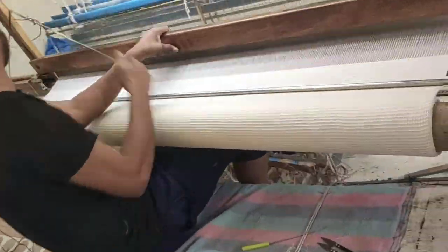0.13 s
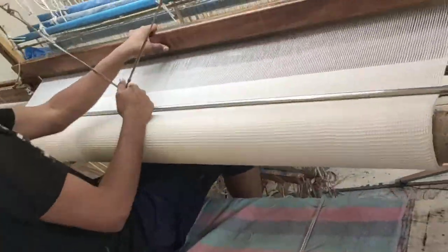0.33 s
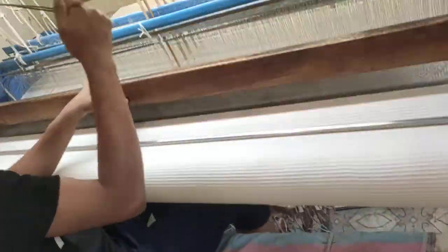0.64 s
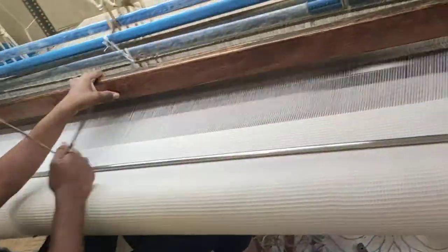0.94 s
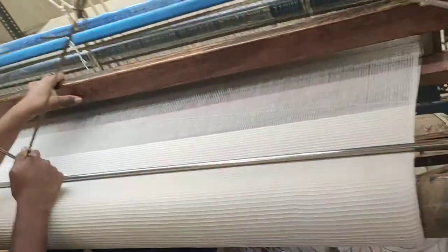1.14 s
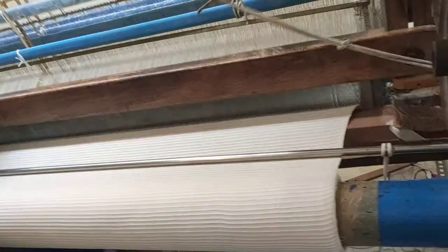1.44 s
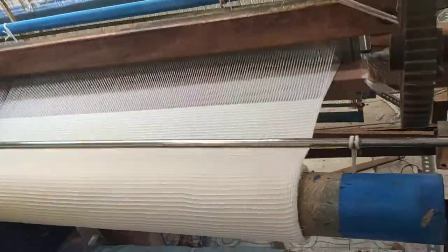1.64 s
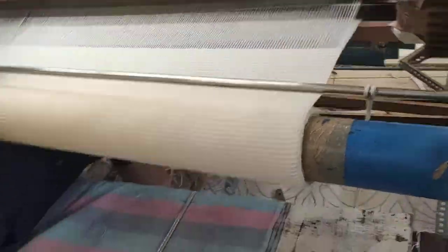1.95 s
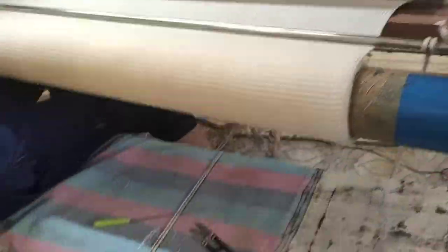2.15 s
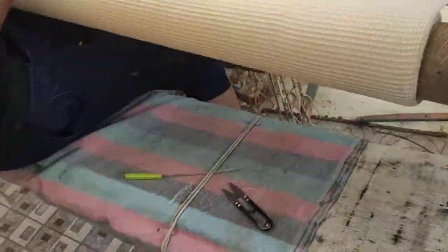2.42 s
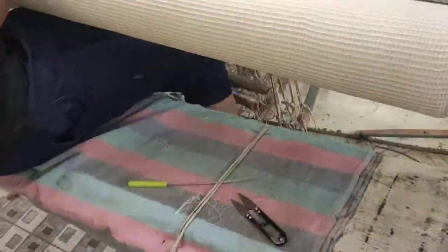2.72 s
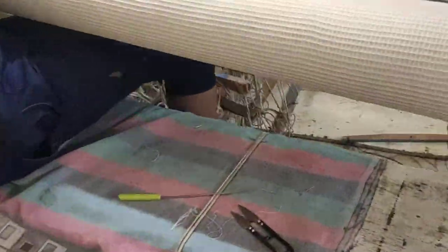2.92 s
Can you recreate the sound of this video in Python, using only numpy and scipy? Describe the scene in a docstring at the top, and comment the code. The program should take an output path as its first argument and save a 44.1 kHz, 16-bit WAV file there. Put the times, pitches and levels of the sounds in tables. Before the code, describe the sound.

A wooden handloom clacks loudly and rapidly, rattling and chinking in a hard-walled workshop.

```python
"""A low workshop drone and the rattle of a wooden handloom come first, close up in a hard-walled room.
Then shuttle, picker and beater clack about four times a second: chattering contacts drive wood, beam and crack.
Smaller taps fall between the blows; loose rings and rods chink in their own modes, and a cord squeaks on its pulley.
Rattle and rustle are grainy noise that follows the shaking loom. The loudest blows overload at full scale."""
import sys
import numpy as np
from scipy import signal
from scipy.fft import rfft, irfft, next_fast_len
from scipy.io import wavfile
from scipy.ndimage import uniform_filter1d

SR = 44100
rng = np.random.default_rng(int(sys.argv[2]) if len(sys.argv) > 2 else 0)


def transcribe(u):
    """Save the signal u as a 16-bit wav file named by the first command-line argument.

    u: samples, shape (n,) or (channels, n), limited to [-1, 1]; the rate is SR.
    q: integer samples, one column per channel.
    """
    v = np.clip(np.atleast_2d(u).T, -1, 1)
    q = np.round(v * 32767).astype(np.int16)
    wavfile.write(sys.argv[1], SR, q)


def voltage_ratio(level):
    """Linear amplitude factor for a level in decibels (scalar or array-like)."""
    return 10 ** (np.asarray(level, float) / 20)


N = 135828  # samples


def along(points, hz):
    """Reads a curve of (Hz, value) points on a log frequency axis."""
    point_hz, value = np.transpose(points)
    return np.interp(np.log(hz + 1), np.log(point_hz + 1), value)


def unit(x):
    """Scales to rms 1."""
    return x / np.sqrt(np.mean(x ** 2) + 1e-20)


def filtered(x, response):
    """Filters x by a complex response of frequency."""
    n = x.shape[-1]
    size = next_fast_len(n + 4096)
    return irfft(rfft(x, size) * response(np.fft.rfftfreq(size, 1 / SR)), size)[..., :n]


def resonances(peaks):
    """Causal sum of damped resonances with alternating sign."""
    def response(f):
        total = 0
        for k, (centre, width, db) in enumerate(peaks):
            band = 1j * f * width
            total = total + (-1) ** k * voltage_ratio(db) * band / (centre ** 2 - f ** 2 + band)
        return total
    return response


def grainy(shape, spiky_db, grain_s):
    """Noise whose size jumps from grain to grain, as in a run of unequal small contacts."""
    step = max(int(grain_s * SR), 1)
    spikes = np.minimum(rng.exponential(1, shape[-1] // step + 1), 3.5)
    size = voltage_ratio(spiky_db * spikes).repeat(step)[:shape[-1]]
    return rng.standard_normal(shape) * uniform_filter1d(size, step)


# how alike left and right are in the wide layers: pitch_hz, likeness (correlation, 0-1)
LIKENESS = [(30,0.56),(125,0.86),(300,0.95),(550,0.7),(1000,0.019)]


def spread(pair, spectrum):
    """Colours two unrelated signals and mixes them to a stereo pair of rms 1 with the tabled likeness."""
    def mid_side(hz):
        angle = np.arccos(np.clip(along(LIKENESS, hz), -1, 1)) / 2
        return voltage_ratio(along(spectrum, hz)) * [np.cos(angle), np.sin(angle)]
    mid, side = filtered(pair, mid_side)
    return unit(np.array([mid + side, mid - side]))


def answer(x, t60, seconds):
    """Reverberates x through a fresh decaying noise tail in each channel; t60 as (Hz, s)."""
    hz, t, grid = signal.stft(rng.standard_normal((2, int(SR * seconds))), SR, nperseg=128)
    decay = voltage_ratio(-60 * t / along(t60, hz)[:, None])
    tail = signal.istft(grid * decay, SR, nperseg=128)[1]
    return signal.fftconvolve(x[None], tail / np.linalg.norm(tail[0]), axes=1)


def add(out, s, x):
    """Mixes x into out from time s."""
    start = round(s * SR)
    out[:, start:start + x.shape[1]] += x


# left-right delay as the camera turns: time_s, right_later_s
TURN = [(.9,.00015),(1.4,-.0003),(2.2,.0002),(2.75,-.00025)]
# decay of the hard-walled room: pitch_hz, t60_s
ROOM_DECAY = [(500,0.35),(3000,0.47),(12000,0.18)]


def place(out, s, x):
    """Sets a sound in space: direct with a left-right delay, then the loom's near surfaces, then the room."""
    near_db, near_t60_s, room_db = 1, .012, -6.5
    half_lag = np.interp(s, *np.transpose(TURN)) / 2
    # the padding leaves space for the channel that is moved earlier
    direct = filtered(np.pad(x, (16, 0)),
                      lambda hz: np.exp(2j * np.pi * hz * half_lag * np.array([[1], [-1]])))
    near = answer(x, [(1000, near_t60_s)], seconds=.03)
    far = answer(x, ROOM_DECAY, seconds=.4)
    add(out, s, direct)
    add(out, s + .0006, voltage_ratio(near_db) * near)
    add(out, s + .006, voltage_ratio(room_db) * far)


# spectrum of the drone: pitch_hz, relative_db (per Hz)
DRONE_COLOUR = [(20,1.5),(110,-2),(200,-2),(400,-1.5),(900,-3.5),(1500,-21.5)]
# hum lines: pitch_hz, level_db (peak)
HUM_LINES = [(100, -44), (132, -43.5)]
# dull thumps: start_s, length_s, level_db (peak), pitch_hz
THUMPS = [(1.61,.07,-26,40),(2.64,.07,-30,35),(1.46,.03,-27,290),(1.49,.04,-29,400)]


def shop():
    """Low noise drone, two hum lines whose phase wanders, and a few thumps with bell-shaped swells."""
    drone_db = -31
    t = np.arange(N) / SR

    def wavering(hz):
        wander = np.cumsum(rng.standard_normal(N)) * 0.0195  # radians
        return np.sin(2 * np.pi * hz * t + wander)

    hum = sum(voltage_ratio(db) * wavering(hz) for hz, db in HUM_LINES)
    thumps = np.zeros(N)
    for s, length, db, hz in THUMPS:
        swell = np.exp(-((t - s - length / 2) / length * 3.0) ** 2)
        thumps += voltage_ratio(db) * swell * wavering(hz)
    drone = voltage_ratio(drone_db) * spread(rng.standard_normal((2, N)), DRONE_COLOUR)
    return drone + hum + thumps


# the loom shaking between blows: time_s, rattle_db (frame), rustle_db (heddles)
SHAKING = [(.03,-21.5,-27),(.26,-26.5,-41),(.37,-18,-28.5),(.5,-22.5,-38),(.6,-20.5,-30.5),(.99,-25,-40.5),(1.07,-16.5,-22.5),(1.15,-18.5,-25),(1.26,-22.5,-31),(1.42,-24,-30.5),(1.5,-21.5,-27.5),(1.68,-26,-41),(1.769,-16,-28),(1.94,-25,-54),(2.04,-20.5,-37),(2.4,-27,-36.5),(2.5,-15,-23.5),(2.57,-20,-24),(2.69,-24.5,-35.5),(2.88,-24,-33),(2.95,-20,-28.5),(3.08,-27.5,-31.5)]
# spectrum of the frame rattle: pitch_hz, relative_db (per Hz)
FRAME_COLOUR = [(500,-26.5),(900,-2.5),(1150,0),(2800,-1.5),(3900,-5.5),(4600,-11.5),(7000,-23)]
# spectrum of the heddle rustle: pitch_hz, relative_db (per Hz)
HEDDLE_COLOUR = [(2500,-24),(4500,1.5),(8000,-1),(12000,-10),(16000,-43)]


def frame():
    """Dense small knocks of the shaking frame and the finer rustle of the heddles, as grainy noise."""
    sharp_hz, sharpens = 9500, .6  # the rustle above this swings wider: extra dB per dB
    s, rattle_db, rustle_db = np.transpose(SHAKING)

    def level(db):
        return voltage_ratio(np.interp(np.arange(N) / SR, s, db))

    rattle = spread(grainy((2, N), spiky_db=1.78, grain_s=.003), FRAME_COLOUR)
    rustle = spread(grainy((2, N), spiky_db=2.5, grain_s=0.0022), HEDDLE_COLOUR)
    top = filtered(rustle, lambda hz: hz ** 2 / (hz ** 2 + sharp_hz ** 2))
    top_db = rustle_db + sharpens * (rustle_db - rustle_db.mean())
    return level(rattle_db) * rattle + level(rustle_db) * (rustle - top) + level(top_db) * top


# wooden blows: start_s, level_db, knock_db (low, over the wood), crack_db (bright, over the wood), chatter_s
BLOWS = [(.288,-9,-8,-4.5,0.0052),(.519,-2.5,-1,-7.5,0.011),(0.556,-17,-8,-13,0.013),(0.746,-8.5,-4.5,-13.5,0.0064),(1.032,-7,-4.5,3,0.0076),(1.049,-16.5,-8,3,0.012),(1.073,-15,-8.5,-4,0.013),(1.2804,-2,-11.5,-8.5,0.011),(1.7382,-7.5,-7,0,0.0035),(1.9671,-3,-3.5,-4.5,0.016),(2.017,-16,-1.5,-20,0.0092),(2.21,-4.5,-3.5,-37,0.0035),(2.43,-23,-5.5,-6,0.027),(2.459,-12.5,-0.5,2.5,0.014),(2.7093,-0.5,-11.5,-9.5,0.014)]
# small loose parts tapping between the blows: start_s, level_db, crack_db (bright, over the wood)
LOOSE_TAPS = [(.332,-23,4.5),(.951,-13,-29),(1.142,-20,7),(1.476,-17,-15),(1.843,-20,4),(2.921,-15,-13),(2.935,-20.5,6.5),(2.976,-16.5,-24)]
# resonances of the struck wood: pitch_hz, width_hz, relative_db
WOOD_PEAKS = [(1637,440,-0.5),(2410,410,2.5),(2817,680,1),(3690,760,-1)]
# resonances of the low knock in the beam: pitch_hz, width_hz, relative_db
BEAM_PEAKS = [(478,316,-10.5),(778,313,-4),(1160,296,1)]
# spectrum of the bright crack, also the tick of the chinks: pitch_hz, relative_db (per Hz)
CRACK_COLOUR = [(3000,-39),(4500,-3),(9000,-1.5),(14800,-11.5),(16000,-49)]


def crack_response(hz):
    """Colour of the bright contact noise."""
    return voltage_ratio(along(CRACK_COLOUR, hz))


def clacks():
    """Each blow or tap is a short chatter of contacts that drives the wood, the beam and a bright crack."""
    rise_s, fall_db, fall_power = 0.00055, 9, 1.92  # attack, loss at the end of the chatter, abruptness
    tap_chatter_s, tap_knock_db = 0.004, -6.5
    out, t = np.zeros((2, N + SR)), np.arange(SR // 10) / SR
    taps = [(s, db, tap_knock_db, crack_db, tap_chatter_s) for s, db, crack_db in LOOSE_TAPS]
    for s, db, knock_db, crack_db, chatter_s in BLOWS + taps:
        fall = voltage_ratio(-fall_db * (t / max(chatter_s, .001)) ** fall_power)
        chatter = (1 - np.exp(-t / rise_s)) * fall
        contacts = unit(grainy((3, len(t)), spiky_db=2.0, grain_s=.0007))

        def driven(noise, response):
            # levelled by the same noise without the chatter envelope
            return filtered(noise * chatter, response) / np.std(filtered(noise, response))

        wood = driven(contacts[0], resonances(WOOD_PEAKS))
        knock = voltage_ratio(knock_db) * driven(contacts[1], resonances(BEAM_PEAKS))
        crack = voltage_ratio(crack_db) * driven(contacts[2], crack_response)
        place(out, s - .0015, voltage_ratio(db) * (wood + knock + crack))
    return out[:, :N]


# ring chinks: start_s, level_db, strike_point (0-1), damping (times the free decay rate)
RING_STRIKES = [(.401,-20,0.22,0.72),(1.867,-12.5,0.1,0.74)]
# modes of the ring: pitch_hz, relative_db, t60_s (at damping 1)
RING_MODES = [(6433,-1,.045),(8086,-9,.06),(9491,1,.045),(10930,-6,.056),(12780,-8,.06),(14920,-4,.04)]
# rod chinks: start_s, level_db, strike_point (0-1 along the rod), damping (times the free decay rate)
ROD_STRIKES = [(.627,-26,.2,2.2),(.674,-28.5,.1,1.3),(.729,-26,.2,1.4),(.827,-27,.2,2.3),(1.445,-17,.3,2.7),(1.494,-17,.19,2.3),(1.552,-23.5,0.22,2.8),(2.148,-22.5,.19,2.4),(2.218,-17,.09,1.25),(2.272,-17.5,0.34,1.1),(2.301,-18.5,.3,3)]
# modes of the rod: pitch_hz, relative_db, t60_s (at damping 1)
ROD_MODES = [(5030,-6,.12),(6380,-2,.16),(7805,0,.13),(9713,-2,.13),(12142,2,.15),(13440,-3,.13),(15000,-4,.13),(15358,-10,.15)]


def chinks(strikes, modes, swell_s):
    """A metal piece rings in the modes that move at the struck point, over a thin noise tick."""
    tick_db, tick_t60_s = -1.5, 0.056
    out, t = np.zeros((2, N + SR)), np.arange(SR // 6) / SR
    for s, db, point, damping in strikes:
        ring = np.zeros(len(t))
        for k, (hz, mode_db, t60) in enumerate(modes):
            decay = voltage_ratio(mode_db - 60 * damping * t / t60)
            movement = np.sin(np.pi * (k + 1) * point)
            ring += decay * movement * np.sin(2 * np.pi * (hz * t + rng.random()))
        ring *= 1 - np.exp(-t / swell_s)
        tick = unit(filtered(rng.standard_normal(len(t)), crack_response))
        tick = tick * voltage_ratio(tick_db - 60 * t / tick_t60_s)
        place(out, s - .001, voltage_ratio(db) * (ring + tick))
    return out[:, :N]


# cord squeaks: start_s, length_s, from_hz, to_hz, level_db (peak, direct sound)
CORD_SQUEAKS = [(0.995,0.031,10200,11700,-26),(1.226,0.066,11300,11000,-27)]


def squeaks():
    """Thin gliding squeaks of a cord on its pulley, made fuzzy by a jittering pitch."""
    out = np.zeros((2, N + SR))
    for s, length, from_hz, to_hz, db in CORD_SQUEAKS:
        n = int(length * SR)
        jitter_hz = 400 * unit(uniform_filter1d(rng.standard_normal(n), size=40))
        hz = np.linspace(from_hz, to_hz, n) + jitter_hz
        tone = np.sin(2 * np.pi * np.cumsum(hz) / SR)
        place(out, s, voltage_ratio(db) * np.hanning(n) ** .5 * tone)
    return out[:, :N]


# stereo balance of the whole mix: pitch_hz, left_over_right_db
BALANCE = [(500,-1),(2500,3),(12000,0.5)]


def scene():
    """Sums all sources in stereo and tilts the left-right balance over frequency."""
    mix = clacks()
    mix = mix + chinks(ROD_STRIKES, ROD_MODES, swell_s=0.00093)
    mix = mix + chinks(RING_STRIKES, RING_MODES, swell_s=0.0017)
    mix = mix + squeaks() + frame() + shop()
    return filtered(mix, lambda hz: voltage_ratio(np.outer([.5, -.5], along(BALANCE, hz))))


def band_limit(x):
    """A steep low-pass at the top of the band."""
    return signal.sosfilt(signal.butter(12, 16310, fs=SR, output="sos"), x)


def record(dry):
    """Cuts the extreme treble, then overloads hard at full scale."""
    top_hz = 15850
    limited = filtered(dry, lambda hz: hz < top_hz)
    overloaded = np.clip(limited, -1, 1)
    return band_limit(overloaded)


dry = scene()
out = record(dry)
transcribe(out)
```